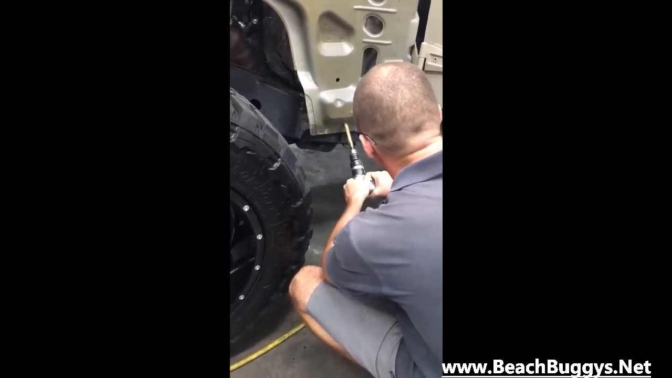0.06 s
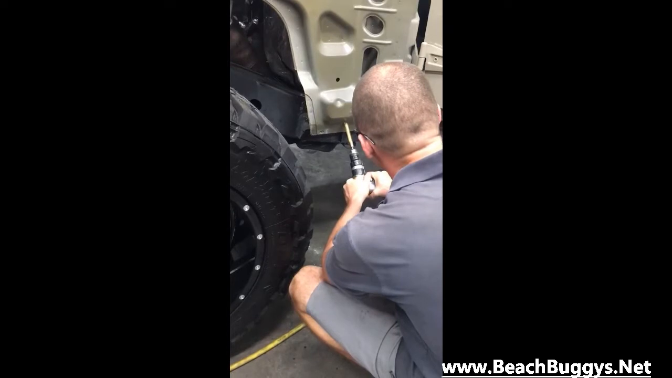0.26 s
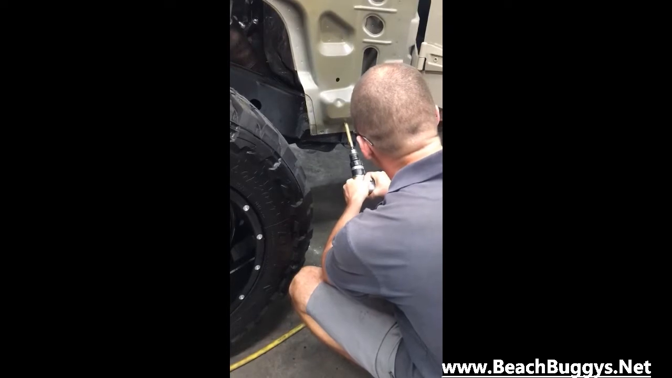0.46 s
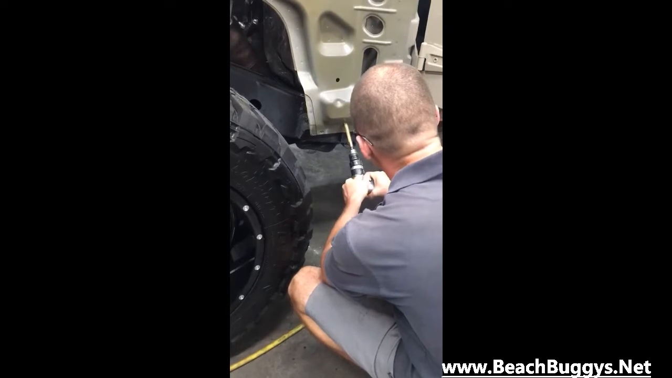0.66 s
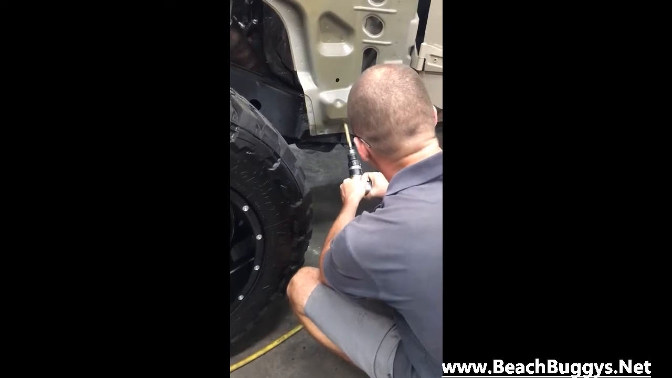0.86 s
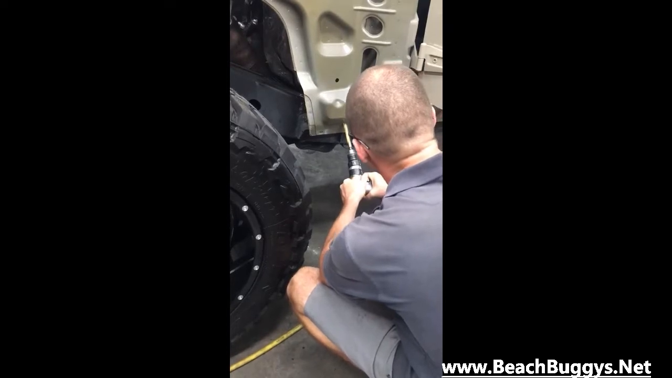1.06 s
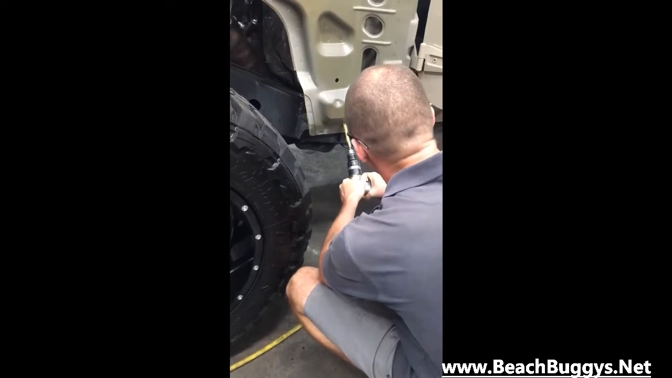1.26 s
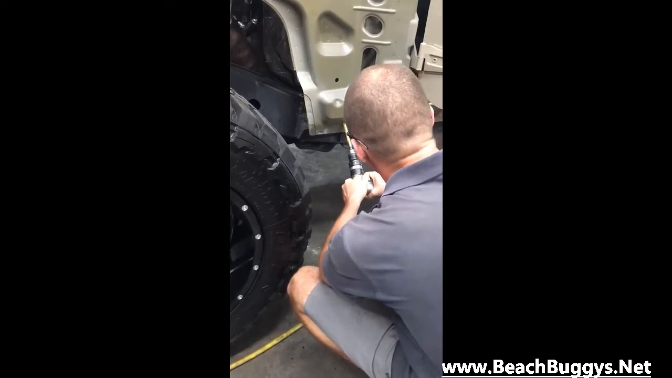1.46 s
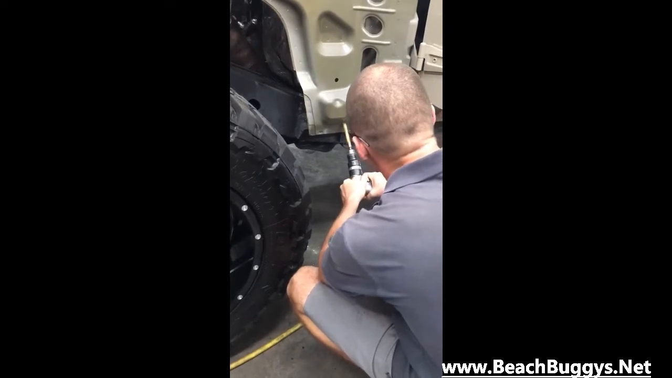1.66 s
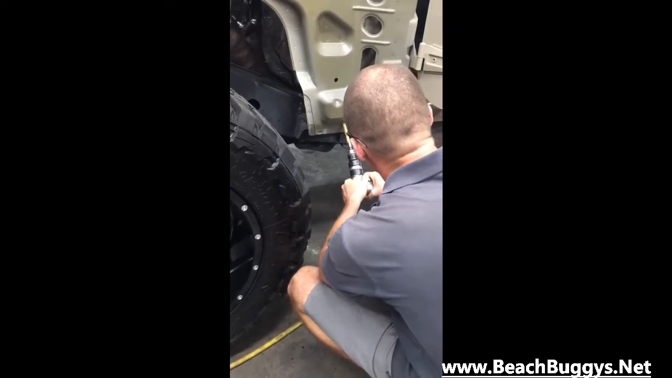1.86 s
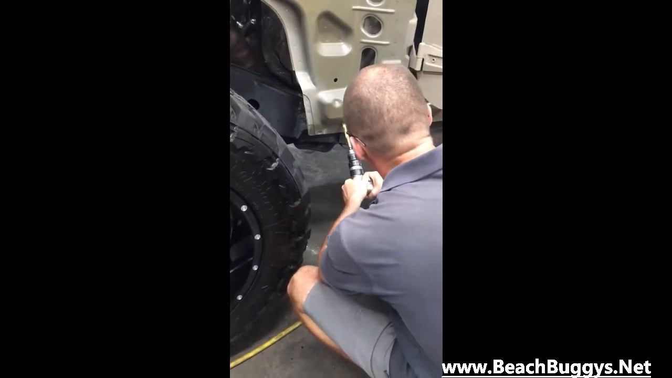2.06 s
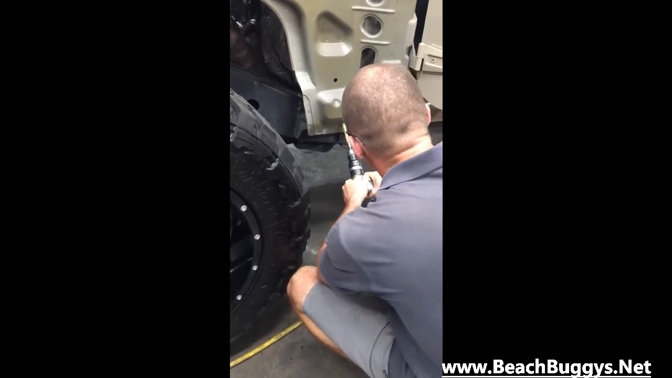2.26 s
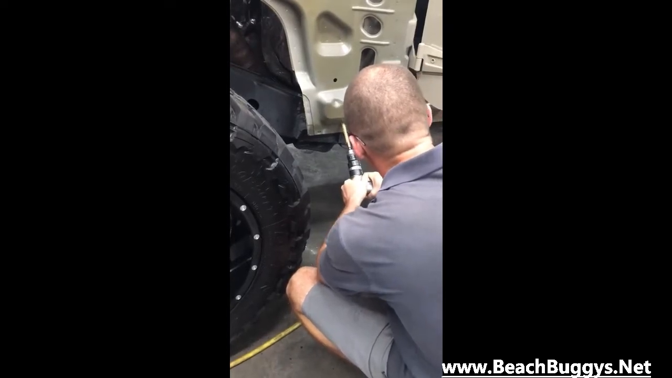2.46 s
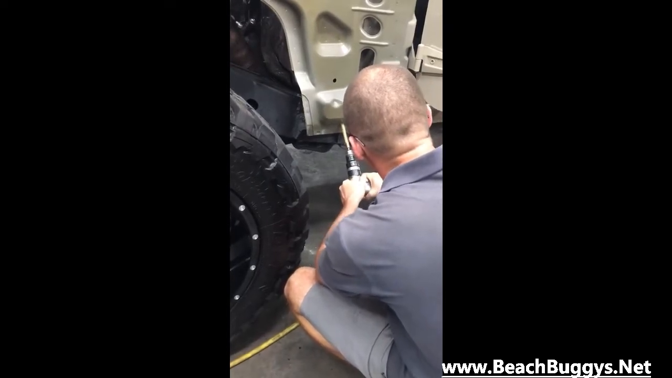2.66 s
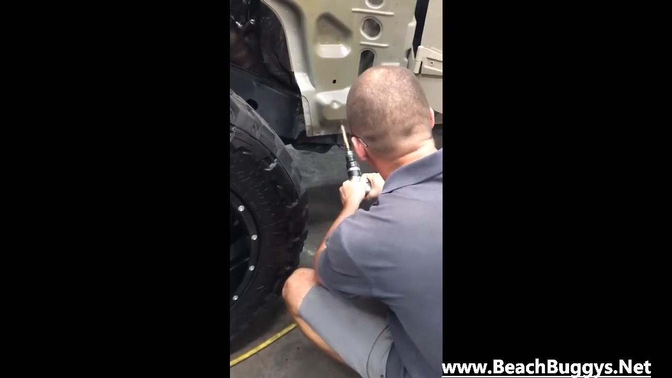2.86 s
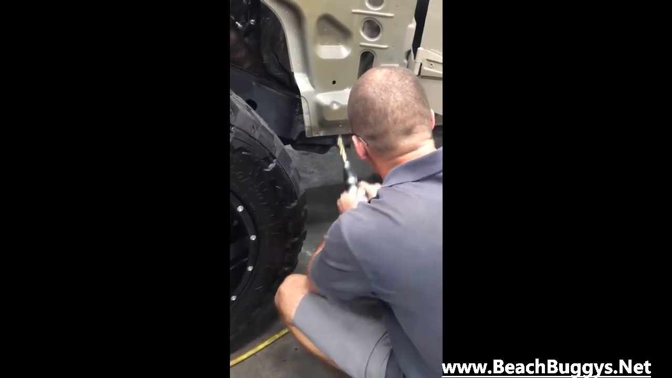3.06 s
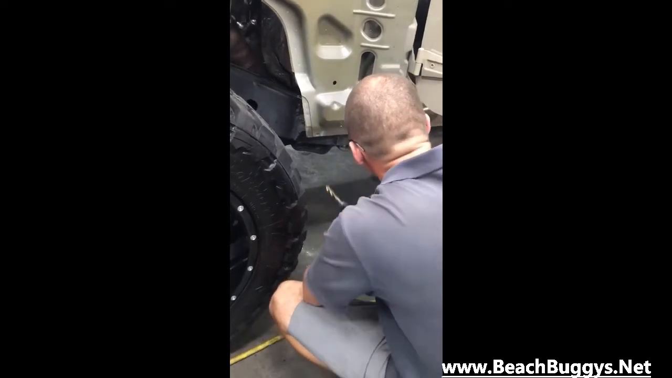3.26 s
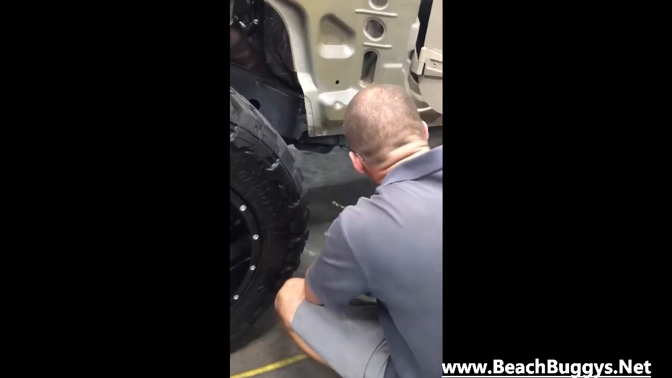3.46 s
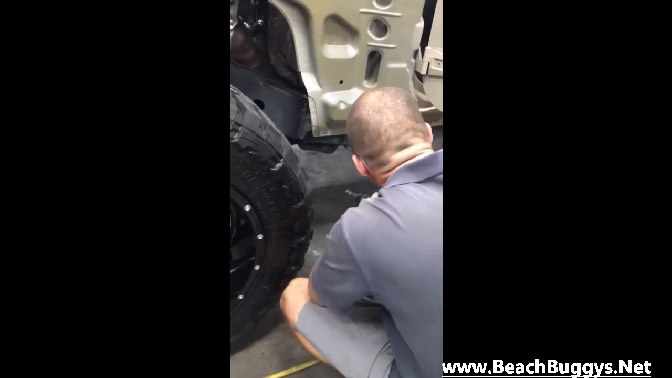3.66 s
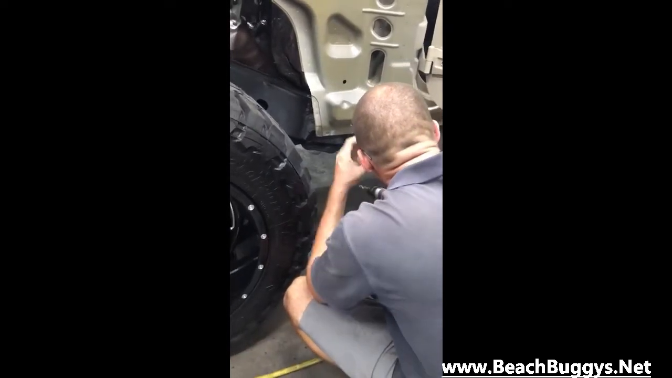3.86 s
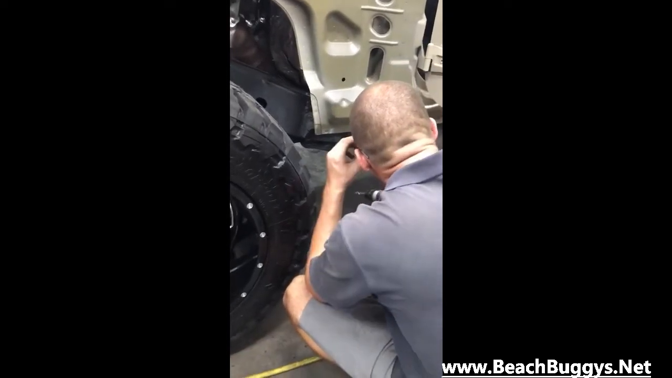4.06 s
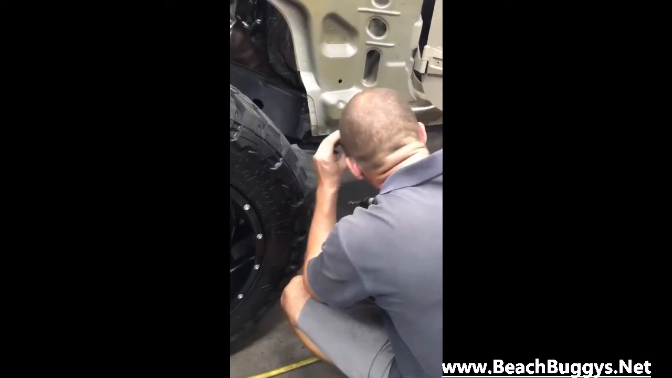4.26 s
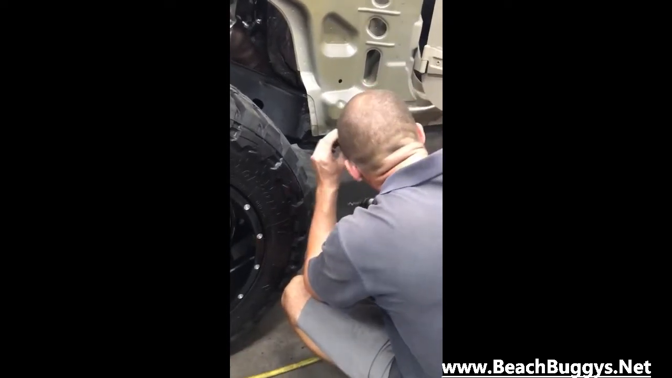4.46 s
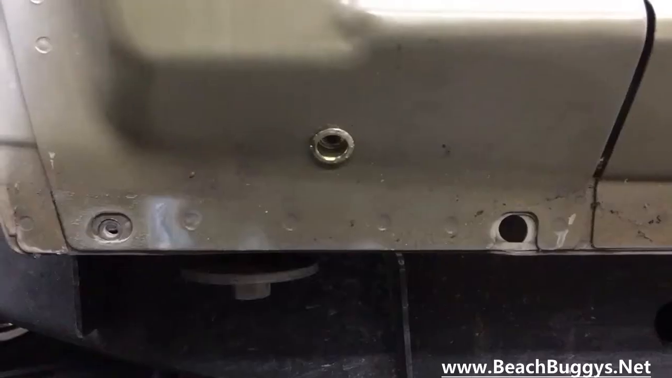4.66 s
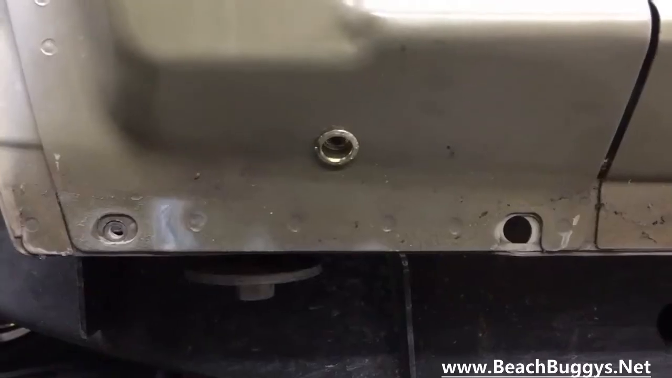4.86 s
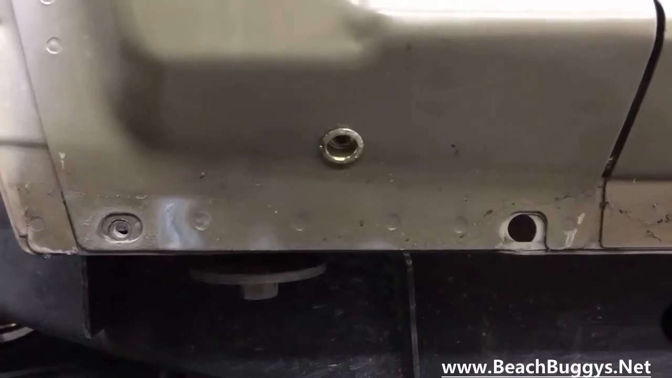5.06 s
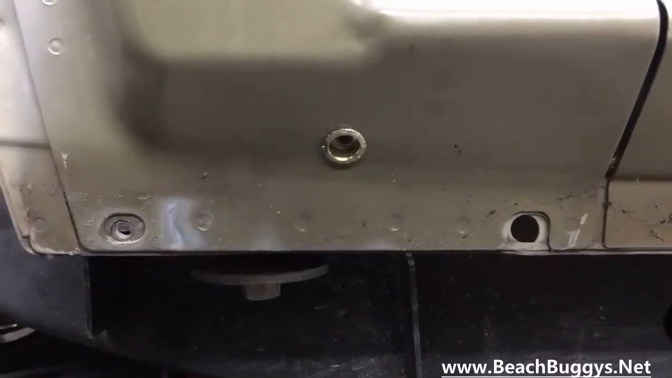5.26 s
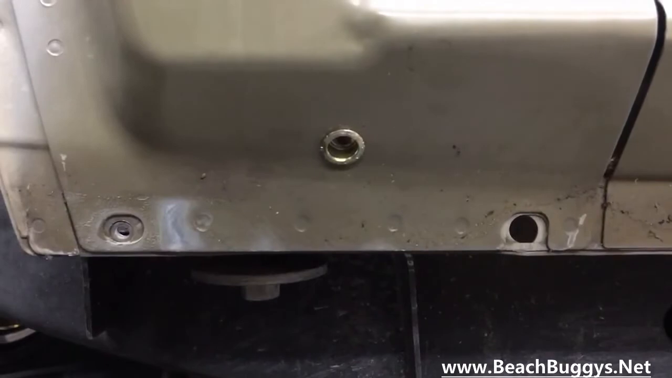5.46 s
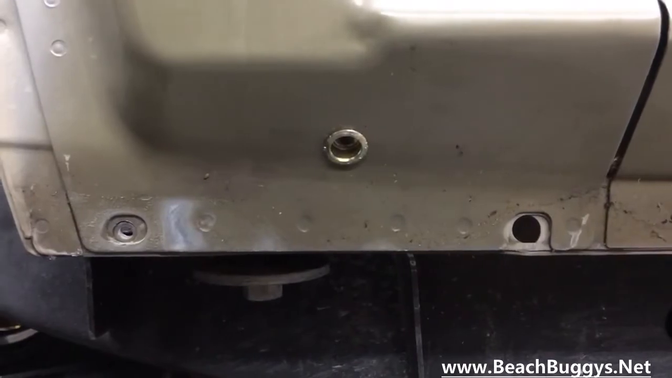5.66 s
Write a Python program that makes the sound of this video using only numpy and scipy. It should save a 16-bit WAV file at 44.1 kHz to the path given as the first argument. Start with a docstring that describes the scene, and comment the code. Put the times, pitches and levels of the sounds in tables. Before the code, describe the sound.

In a hard, echoing workshop, a handheld drill bores into a steel car panel close to the microphone. A piercing fluttering squeal rides over motor whine and crunching chips, turns loose and rattly, snags with shrieks at breakthrough, spins free briefly and brakes. The ring fades into low machine hum, then a tiny gap and quieter room tone.

```python
"""In an echoing workshop a cordless drill bores through a sheet-steel car panel.
Each bite of a cutting edge starts decaying bit modes (squeal), modulates chip noise and drums the panel.
The drill slows under load; the widening hole adds rattle; edges snag, the bit breaks through and spins free
with a louder gear whine, then the motor brakes. Squeal, shrieks, squeaks, panel buzz, motor and hum are sines;
chips, rattle, rasps and air are shaped noise. A machine hums on; near the end it cuts to a quieter room tone."""
import sys
import numpy as np
from scipy import signal
from scipy.fft import rfft, irfft
from scipy.io import wavfile
from scipy.ndimage import uniform_filter1d

SR = 44100
rng = np.random.default_rng(int(sys.argv[2]) if len(sys.argv) > 2 else 0)


def int16_out(signal):
    """Quantize to a 16-bit WAV file."""
    q = np.round(np.clip(np.atleast_2d(signal).T, -1, 1) * 32767)
    wavfile.write(sys.argv[1], SR, q.astype(np.int16))


N = 252252
T = np.arange(N) / SR

# Stages of the hole: tip seats, bit starts to run loose, breaks through, spins free; then the motor brakes.
SEATED_S, LOOSE_S, THROUGH_S, FREE_S, BRAKE_S = 0.54, 1.85, 2.72, 3.45, 3.548
REFERENCE_BITES_PER_S = 46.4  # speed-dependent levels are given at this rate
BIT_HZ, BIT_LOW_HZ = 3313.6, 3214  # two close bending modes of the bit


def undb(db):
    """Decibels to gain."""
    return 10 ** (np.asarray(db) / 20)


def unit(x):
    """Scale to rms 1."""
    return x / np.sqrt(np.mean(np.abs(x) ** 2))


def curves(table):
    """Each column of a table after the first (seconds), joined by straight lines in time."""
    s, *columns = np.transpose(table)
    return [np.interp(T, s, column) for column in columns]


def until(end_s, fade_s):
    """1 up to the end time, then a straight fade to 0."""
    return np.clip(1 - (T - end_s) / fade_s, 0, 1)


def since(start_s, rise_s):
    """0 up to the start time, then a straight rise to 1."""
    return 1 - until(start_s, rise_s)


def bell(middle_s, half_s):
    """Gaussian gain in time, down to 1/e at the half length."""
    return np.exp(-((T - middle_s) / half_s) ** 2)


def swells(table):
    """Summed gain of bell-shaped swells (middle s, half length s, dB)."""
    return sum(undb(db) * bell(middle_s, half_s) for middle_s, half_s, db in table)


def colour(x, points):
    """Shape a sound by a (Hz, dB) spectrum, log-frequency interpolated, at rms 1."""
    point_hz, point_db = np.transpose(points)
    hz = np.fft.rfftfreq(2 * N, 1 / SR)
    gain = undb(np.interp(np.log(hz + 1), np.log(point_hz), point_db))
    return unit(irfft(rfft(x, 2 * N) * gain)[:N])


def ring(x, modes):
    """Pass a push through parallel (Hz, width Hz, dB) resonances, at rms 1."""
    rung = 0
    for hz, width_hz, db in modes:
        b, a = signal.iirpeak(hz, hz / width_hz, SR)
        rung = rung + undb(db) * signal.lfilter(b, a, x)
    return unit(rung)


def walk(knots_per_s):
    """Smooth random wander of rms 1."""
    knots = rng.standard_normal(8192)
    line = np.interp(T * knots_per_s, np.arange(len(knots)), knots)
    return unit(uniform_filter1d(line, max(int(SR / knots_per_s / 2), 1)))


def grains(per_s, spread_db):
    """Dense tiny fractures at random times, of random size, at rms 1."""
    size = undb(spread_db * np.minimum(rng.exponential(size=N), 4))
    hit = rng.random(N) < per_s / SR
    return unit(hit * size * rng.standard_normal(N))


# Squeals of the bit. Each row: start in seconds, length in seconds, level of the note in dB,
# swell in dB per second, level of its octave in dB.
BIT_SQUEALS = [(0, 2.27, -21.5, -3.5, -24.5), (2.263, 0.14, -30, -1.5, -34.5),
               (2.46, 0.26, -30.5, -7.5, -44), (2.763, 0.16, -30, 19.5, -30.5), (2.966, 0.16, -25, 6, -32),
               (3.225, 0.15, -25, 0, -32)]


def squeal_levels(bites_per_s, fade_s=0.04, speed_db=0.1):
    """Levels in dB of squeal note and octave: each sets in, swells or tires, stops; slower is weaker."""
    first = octave = 1e-4  # floor of -80 dB
    for start_s, length_s, db, swell_db_per_s, octave_db in BIT_SQUEALS:
        held = since(start_s - fade_s, fade_s) * until(start_s + length_s, fade_s)
        first = first + held * undb(db + swell_db_per_s * np.clip(T - start_s, 0, length_s))
        octave = octave + held * undb(octave_db)
    return 20 * np.log10([first, octave]) + speed_db * (bites_per_s - REFERENCE_BITES_PER_S)


# Pitch shift of the squeal with the grip of the hole on the bit. Each row: time in seconds, shift in Hz.
GRIP_SHIFT = [(0.6, 8), (1.05, -42), (1.7, 4), (3.08, 10), (3.35, -70)]
# Leans of the drill, making one edge bite harder. Each row: middle in seconds, half length in seconds,
# difference between the two edges in dB (the sign says which edge).
DRILL_LEANS = [(0.681, 0.2, 6), (1.299, 0.13, -5.5), (1.55, 0.06, -2.5)]


def squeal(turn, bites_per_s, first_db, octave_db):
    """Each bite starts two bit modes in step; they beat and fade; the slipping contact adds overtones."""
    bite = turn.astype(int)
    age_s = (turn - bite) / bites_per_s
    beat_rate, beat_phase, bite_size = rng.standard_normal((bite[-1] + 1, 3))[bite].T
    attack = 1 - np.exp(-(age_s / 0.0063) ** 2)
    release = np.clip((bite + 1 - turn) / 0.088, 0, 1)
    swell = attack * release

    shift_hz, = curves(GRIP_SHIFT)
    upper = np.exp(2j * np.pi * np.cumsum(BIT_HZ + shift_hz + 15 * walk(70)) / SR)
    beat_angle = 2 * np.pi * (BIT_LOW_HZ - BIT_HZ) * (age_s - .0038) * (1 + .09 * beat_rate)
    beat = np.exp(1j * (beat_angle + .45 * beat_phase))

    lean_db = sum(db * bell(middle_s, half_s) for middle_s, half_s, db in DRILL_LEANS)
    uneven_db = np.interp(T, [1.2, 2.0], [.8, 2.0])  # bites grow uneven as the hole deepens
    size = undb(uneven_db * bite_size + lean_db * (np.mod(bite, 2) - .5))

    first = unit((swell * np.exp(-age_s / 0.0098) * size * upper * (1 + beat)).real)
    contact = swell * upper * (1 + .22 * beat)
    octave = unit((np.exp(-age_s / 0.0038) * size * contact ** 2).real)
    third = unit((np.exp(-age_s / 0.0024) * size * contact ** 3).real)
    # a weak squeal loses its third harmonic
    third_db = octave_db - 4.5 + 0.94 * np.minimum(first_db + 23.5, 0)
    return first * undb(first_db) + octave * undb(octave_db) + third * undb(third_db)


# Colour of the chip noise. Each row: frequency in Hz, level in dB.
CHIP_COLOUR = [(1500, -16), (2600, 3.5), (3400, 5), (3900, -1.5), (5200, -2.5), (6200, -1.5), (8000, 0),
               (9800, 1), (10450, -9.5), (11000, -2), (13500, -3), (15800, -12)]
# Ringing of bit and chuck under the chips. Each row: frequency in Hz, width in Hz, level in dB.
STEEL_MODES = [(5605, 49, -3), (6650, 170, -8), (6960, 120, -0.5), (7430, 120, -1), (8336, 87, 5),
               (9890, 300, -15.5)]
# Ringing of the panel. Each row: frequency in Hz, width in Hz, level in dB.
PANEL_MODES = [(669, 14, -2), (825.6, 38, 4), (874, 41, 3.5), (972, 34, 5), (1084, 60, 3.5),
               (1831, 73, 3.5), (2164, 260, -5), (2704, 140, 0)]
# Chatters of the bit, shaking the panel. Each row: middle in seconds, half length in seconds,
# level in dB, strongest pitch in Hz.
BIT_CHATTERS = [(0.87, 0.076, -29, 869), (1.546, 0.37, -30.5, 850), (2.166, 0.049, -25, 830),
                (2.31, 0.049, -25.5, 850), (2.83, 0.042, -25, 1050), (3.128, 0.058, -26, 780),
                (3.313, 0.04, -27, 740), (3.37, 0.054, -25.5, 1150)]
# Colour of the loose rattle. Each row: frequency in Hz, level in dB.
RATTLE_COLOUR = [(90, -27), (160, 3.5), (300, -6), (480, -2.5), (650, 0.5), (850, -7), (1500, 2),
                 (2600, -2.5), (4000, -10), (8000, -33.5)]
# Rasps of the bit binding in the hole. Each row: middle in seconds, half length in seconds, level in dB.
BIT_BINDS = [(0.25, 0.2, -31.5), (1.5, 0.29, -36), (2.21, 0.03, -26), (2.3, 0.03, -21.5),
             (2.372, 0.014, -26), (3.43, 0.021, -22.5)]


def cutting(turn, bites_per_s, loose):
    """Chips tear off hardest in a bite and ring the steel; the panel shakes most between bites."""
    chips_db = -30.5 + 0.0356 * (bites_per_s - REFERENCE_BITES_PER_S)
    chips_db = chips_db + 0.93 * since(THROUGH_S, 0.055) - 6 * since(FREE_S, 0.12)
    panel_db = -27.5 - 3.0 * since(LOOSE_S, 0.066)  # panel notes drown in rattle
    bite = np.cos(np.pi * (turn - .15)) ** 8

    tearing = grains(per_s=14000, spread_db=2.0) * undb(5.25 * bite + walk(130))
    chips = colour(tearing, CHIP_COLOUR) * undb(4.5) + ring(tearing, STEEL_MODES) * undb(-3.0)

    shaking = grains(per_s=5000, spread_db=1.3) * undb(walk(200) - 5.5 * bite)
    panel = ring(shaking, PANEL_MODES) * undb(panel_db)

    jolts = ring(grains(per_s=5000, spread_db=1.7) * undb(-5.0 * bite), PANEL_MODES)
    chatter = 0
    for middle_s, half_s, db, hz in BIT_CHATTERS:
        chatter = chatter + ring(jolts, [(hz, 300, 0)]) * swells([(middle_s, half_s, db)])

    rattle = colour(grains(per_s=6500, spread_db=0.0), RATTLE_COLOUR) * undb(chips_db - 0.5 + 4.23 * loose)
    rasp = ring(grains(per_s=900, spread_db=4.5), [(2766, 180, 0)]) * swells(BIT_BINDS)
    return chips * undb(chips_db) + panel + chatter + rattle + rasp


# Drumming of the panel. Each row: multiple of the bite rate, level in dB.
DRUM_HARMONICS = [(3, -7), (4, -8), (5, -1), (6, -2.5), (7, -19), (8, -6.5), (10, -11.5), (11, -14)]


def drumming(turn, loose):
    """Low panel buzz at multiples of the bite rate: steady, then weaker, deeper and ragged once seated."""
    seated = since(SEATED_S, 0.089)
    # relative level; the ragged gain and rms scaling below also act
    drum_db = -36.5 - 14.5 * seated + 5.5 * loose - 5.0 * until(0, 0.079)
    ragged = .04 + 0.41 * seated + .3 * loose
    buzz = 0
    for multiple, db in DRUM_HARMONICS:
        level_db = db + 3 * ragged * walk(7.4) - 5.2 * ragged * multiple
        buzz = buzz + undb(level_db) * np.sin(2 * np.pi * multiple * turn + ragged * walk(11))
    return unit(buzz * undb(14 * ragged)) * undb(drum_db)


def gears(turn, bites_per_s):
    """Shaft hum plus a gear-mesh sine: wavers under load, blurs in the open hole, clears and swells free."""
    free = since(FREE_S, 0.029)
    slack = since(THROUGH_S, 0.068) * (1 - free)
    unsteady = 1 - .15 * free + .8 * slack + .3 * since(SEATED_S, .3) * until(THROUGH_S, .1)

    waver = 2 * np.pi * np.cumsum(26 * unsteady * walk(110)) / SR
    mesh = np.sin(2 * np.pi * 51.7 * turn + waver + .6 * unsteady * walk(170))
    mesh = mesh * undb(2 * unsteady * walk(90))
    whine_db = -30.5 + 0.4 * (bites_per_s - REFERENCE_BITES_PER_S) + 7 * free - 5 * slack

    shaft = np.sin(2 * np.pi * 9.05 * turn + .2 * walk(15))
    shaft = shaft + (.3 + .6 * since(1.3, .2)) * np.sin(2 * np.pi * 7 * turn)
    # rises 3 dB per second, drops once the bit runs loose
    shaft_db = -43.0 + 3 * np.minimum(T, LOOSE_S) - 8 * since(LOOSE_S, .08)
    return unit(mesh) * undb(whine_db) + unit(shaft) * undb(shaft_db)


# Snags of the edge on the rim of the hole. Each row: time in seconds, reference peak in dB,
# shriek relative to it in dB, octave of the shriek relative to it in dB.
RIM_SNAGS = [(2.212, -22, 8.5, 4), (2.79, -15, -5.5, -6), (2.811, -10, -16, -15), (2.836, -19.5, -0.5, 6.5),
             (2.859, -16, -9.5, -9.5), (2.9, -15.5, -14, -13), (2.965, -16.5, -2.5, -4),
             (3.007, -16.5, -1, 2.5), (3.052, -16, 2, 4.5), (3.098, -20, 6, -2), (3.148, -19.5, -2, 3.5),
             (3.195, -17, -8, 0.5)]


def snags():
    """A caught edge lets go with a crunch of noise and a short shriek at the bit's pitch."""
    push, shriek, octave = np.zeros(N), np.zeros(N), np.zeros(N)
    for s, db, shriek_db, octave_db in RIM_SNAGS:
        age = np.maximum(T - s + 0.0011, 0) / 0.0026
        burst = age * np.exp(1 - age) * undb(db)
        push += burst
        shriek += burst * undb(shriek_db)
        octave += burst * undb(octave_db)
    phase = 2 * np.pi * np.cumsum(BIT_HZ + 25 * walk(60)) / SR
    crunch = colour(np.gradient(rng.standard_normal(N)), CHIP_COLOUR) * undb(-5.0)
    return push * crunch + shriek * np.sin(phase) + octave * np.sin(2 * phase)


# Colour of the burr tearing off the rim. Each row: frequency in Hz, level in dB.
BURR_COLOUR = [(2000, -19.5), (4500, 4.5), (14000, -2), (16000, -11)]
# Low ringing of the loose panel. Each row: frequency in Hz, width in Hz, level in dB.
BOOM_MODES = [(136, 20, -5), (215, 56, -9.5), (362, 60, -9.5), (660, 51, -3.5)]
# Booms as the bit pushes through. Each row: middle in seconds, half length in seconds, level in dB.
PANEL_BOOMS = [(2.68, 0.17, -33), (2.95, 0.094, -33), (3.36, 0.12, -28.5)]


def breakthrough():
    """Edges tear at the burr once the tip is through; the loose panel booms around that time."""
    burr = colour(grains(per_s=21000, spread_db=-0.5), BURR_COLOUR) * since(THROUGH_S, 0.052) * undb(-32)
    boom = ring(grains(per_s=3000, spread_db=2.5), BOOM_MODES) * swells(PANEL_BOOMS)
    return burr + boom


# Thin squeaks of the bit's flank in the finished hole. Each row: middle in seconds, peak in dB.
FLANK_SQUEAKS = [(3.401, -17), (3.418, -14)]


def squeaks():
    """The flank of the bit skids on the rim: short 10 kHz sine bursts."""
    skid = sum(undb(db) * bell(s, 0.0026) for s, db in FLANK_SQUEAKS)
    return skid * np.sin(2 * np.pi * 10040 * T)


def brake():
    """The trigger is let go: the motor's pitch dives and the gear train clacks."""
    hz = np.clip(600 - 9000 * (T - BRAKE_S), 350, 850)
    dive = np.sin(2 * np.pi * np.cumsum(hz) / SR + 0.54 * walk(200)) * bell(BRAKE_S, 0.015)
    clack = ring(rng.standard_normal(N), [(684, 300, 2.5), (2770, 120, 8.7)])
    clack = clack * bell(BRAKE_S - 0.0075, 0.017)
    return dive * undb(-19.0) + clack * undb(-21.0)


# Ringing of the rubbed bit. Each row: frequency in Hz, width in Hz, level in dB.
RUBBED_BIT_MODES = [(2260, 170, 5), (2750, 150, -12), (3200, 150, -10)]
# Rubs of the bit on the rim on its way out. Each row: middle in seconds, half length in seconds, level in dB.
RIM_RUBS = [(3.77, 0.038, -37), (3.88, 0.04, -50)]


def withdrawal():
    """Noise rings the bit as it rubs faintly on the rim while drawn out."""
    ringing = ring(rng.standard_normal(N), RUBBED_BIT_MODES)
    scrape = ring(rng.standard_normal(N), [(2900, 1300, 0)]) * undb(-8)
    return (ringing + scrape) * swells(RIM_RUBS)


# Reverberation of the workshop. Each row: frequency in Hz, 60 dB decay time in seconds.
WORKSHOP_T60 = [(150, 1.146), (600, 0.9), (2400, 1.22), (5000, 0.89), (9000, 0.5), (15000, 0.55)]


def workshop(x, wet_db, early_db):
    """Quick reflections from the car body, then a long tail that dulls as it fades."""
    t = T[:int(1.5 * SR)]
    f, at_s, cells = signal.stft(rng.standard_normal(len(t)), SR, nperseg=256)
    hz, t60_s = np.transpose(WORKSHOP_T60)
    decay_s = np.interp(np.log(f + 1), np.log(hz), t60_s)[:, None]
    tail = signal.istft(cells * np.exp(-np.log(1000) * at_s / decay_s), SR)[1][:len(t)]
    tail = tail * np.clip(t / 0.024, 0, 1)
    early = rng.standard_normal(len(t)) * np.exp(-t / 0.00313) * (t > .002)
    response = undb(wet_db) * tail / np.linalg.norm(tail) + undb(early_db) * early / np.linalg.norm(early)
    # the drill has been running for a while: prepend its first 0.5 s so the room already rings
    lead = SR // 2
    return x + signal.fftconvolve(np.r_[x[:lead], x], response)[lead:lead + N]


# Reference level of the machine and its air. Each row: time in seconds, level in dB.
MACHINE_LEVEL = [(0, -46.5), (2.2, -46), (4.1, -38)]
# Hum lines of the machine. Each row: frequency in Hz, level in dB.
MACHINE_LINES = [(48.4, 3.5), (96.9, -1.5), (145.3, -1), (280, -8.5), (339, -9), (565, -18)]
# Colour of the workshop air. Each row: frequency in Hz, level in dB.
SHOP_AIR = [(35, -27), (60, -3), (74, -14), (152, -2), (248, -14), (285, -10.5), (450, -11), (600, -10.5),
            (780, -17.5), (2150, -25), (5080, -39), (15500, -41.5)]


def machine():
    """A motor hums somewhere in the shop, as wavering sines, over a wash of air noise."""
    level_db, = curves(MACHINE_LEVEL)
    hum = 0
    for hz, db in MACHINE_LINES:
        hum = hum + undb(db + 2.6 * walk(7.8)) * np.sin(2 * np.pi * hz * T + 0.65 * walk(11))
    air = colour(rng.standard_normal(N), SHOP_AIR) * undb(.7 * walk(5.5))
    return undb(level_db) * (unit(hum) * undb(3.0) + air * undb(1.0))


# Colour of the quiet room's air. Each row: frequency in Hz, level in dB.
QUIET_AIR = [(18, -48), (30, -12), (108, -8), (125, -18), (165, -18), (523, -23.5), (850, -24), (1740, -31),
             (2800, -43.5), (12000, -59), (15600, -90)]


def quiet_room():
    """Still air with a faint hollow drone of ringing noise and a weak 102 Hz hum that soon grows."""
    air = colour(rng.standard_normal(N), QUIET_AIR) * undb(-48.0 + 0.76 * walk(8))
    drone = ring(rng.standard_normal(N), [(621, 22, 3), (1685, 91, -11)]) * undb(-57.5)
    hum = np.sin(2 * np.pi * 102 * T + .5 * walk(6.8)) * undb(-58.5 + 11.4 * since(5.36, .15))
    return air + drone + hum


# Speed of the drill. Each row: time in seconds, bites of the cutting edges per second.
DRILL_SPEED = [(0.0, 43.99), (0.46, 46.26), (0.65, 39.78), (0.88, 43.42), (1.4, 42.36), (1.57, 41.04),
               (1.84, 40.88), (1.94, 33.75), (2.25, 43.46), (2.39, 34.22), (2.69, 32.1), (2.91, 49.38),
               (3.09, 41.06), (3.22, 46.23), (3.42, 37.8), (3.458, 38.1), (3.484, 42), (3.51, 44.3)]


def scene():
    """Drill in its room, driven by speed and by how far the hole has widened; then the quiet room."""
    bites_per_s, = curves(DRILL_SPEED)
    turn = np.cumsum(bites_per_s) / SR + .61  # counted in bites
    loose = since(LOOSE_S, 0.37)

    first_db, octave_db = squeal_levels(bites_per_s)
    boring = squeal(turn, bites_per_s, first_db, octave_db)
    boring = boring + cutting(turn, bites_per_s, loose) + breakthrough()
    metal = boring * until(BRAKE_S - .01, fade_s=0.021) + snags() + squeaks() + brake() + withdrawal()
    motor = gears(turn, bites_per_s) + drumming(turn, loose)
    motor = motor * until(BRAKE_S - .003, fade_s=0.014)

    # the ringing metal fills the room more than the motor and its buzz do
    shop = workshop(metal, wet_db=-7.5, early_db=-13) + workshop(motor, wet_db=-14.5, early_db=-15.5)
    shop = shop + machine()
    # a brief silence separates the two rooms
    return (shop * until(4.988, fade_s=0.0029) + quiet_room() * (T > 5.031))[None]


def record(dry):
    """The phone cuts the top: a steep elliptic low-pass at 15850 Hz."""
    low_pass = signal.ellip(10, .2, 80, 15850, fs=SR, output="sos")
    return signal.sosfilt(low_pass, dry)


dry = scene()
out = record(dry)
int16_out(out)
```